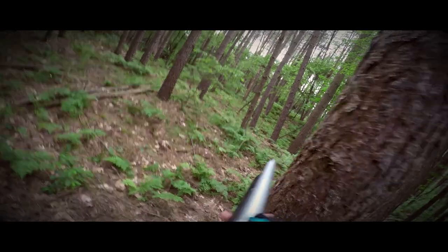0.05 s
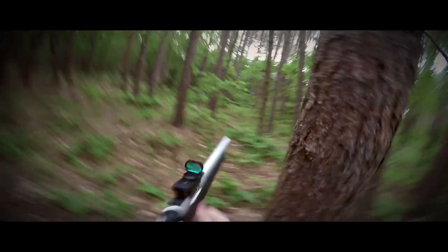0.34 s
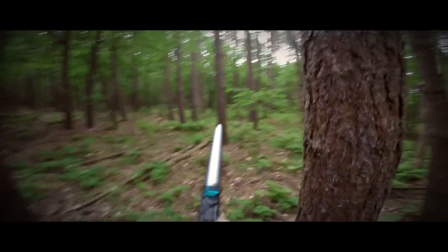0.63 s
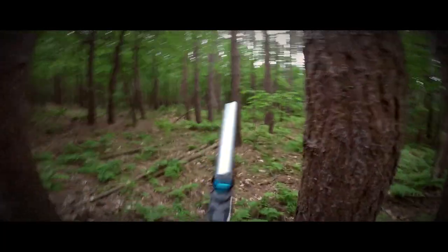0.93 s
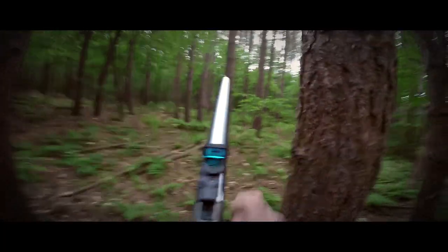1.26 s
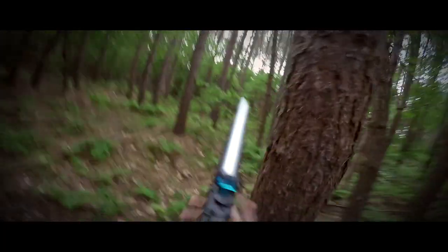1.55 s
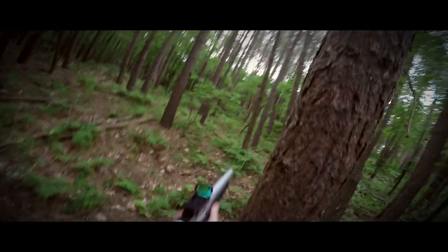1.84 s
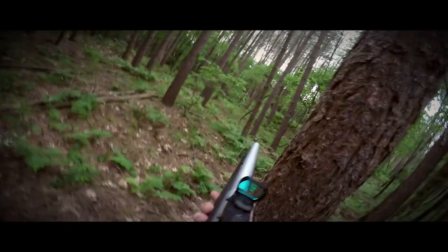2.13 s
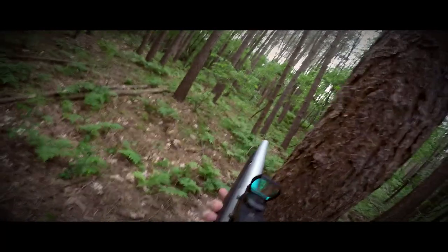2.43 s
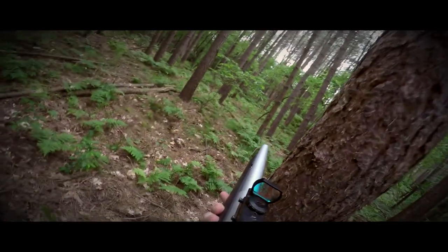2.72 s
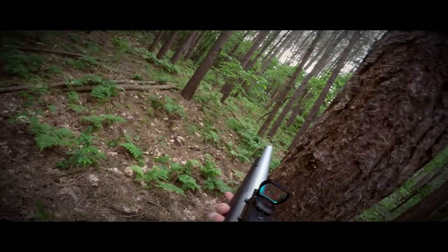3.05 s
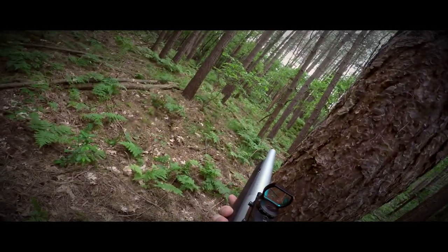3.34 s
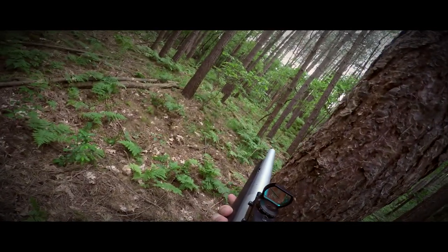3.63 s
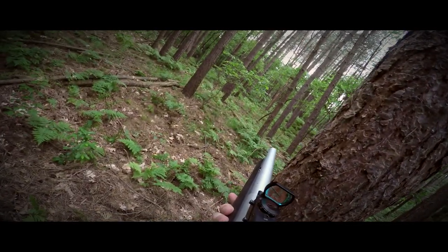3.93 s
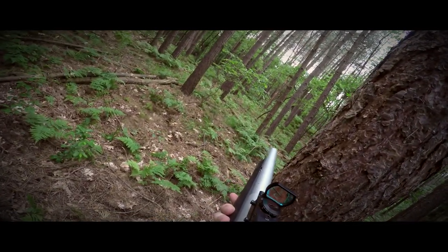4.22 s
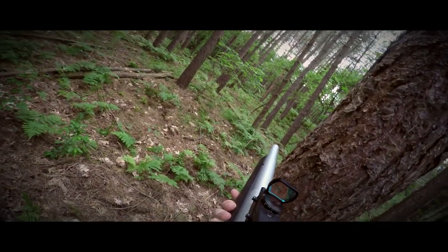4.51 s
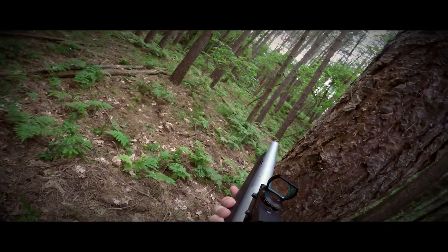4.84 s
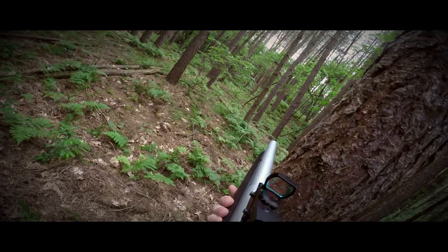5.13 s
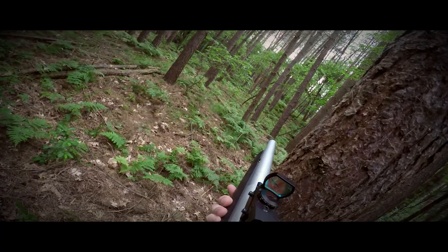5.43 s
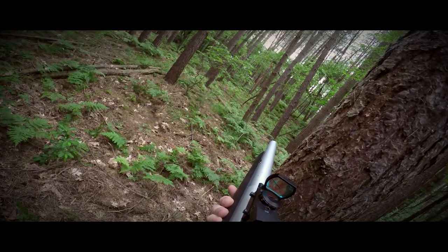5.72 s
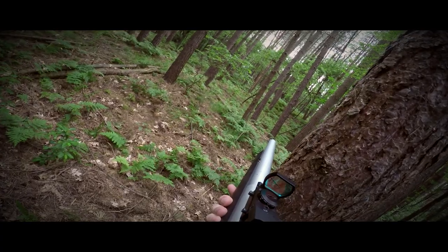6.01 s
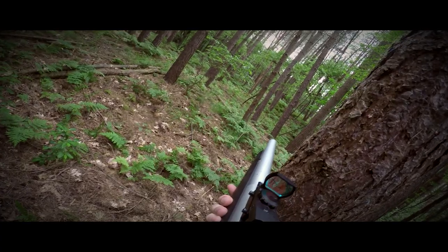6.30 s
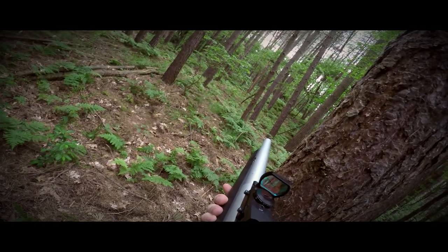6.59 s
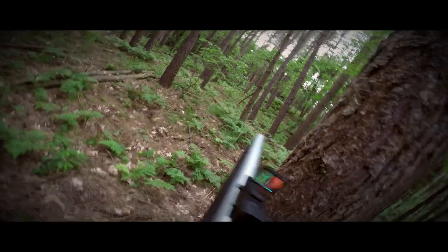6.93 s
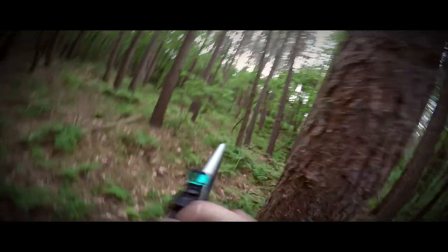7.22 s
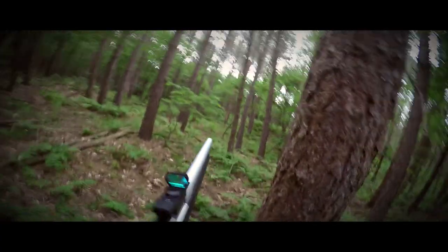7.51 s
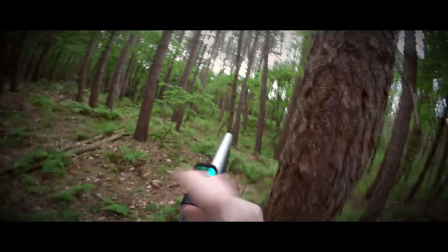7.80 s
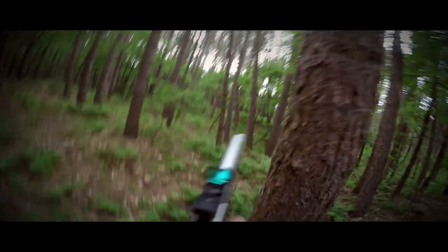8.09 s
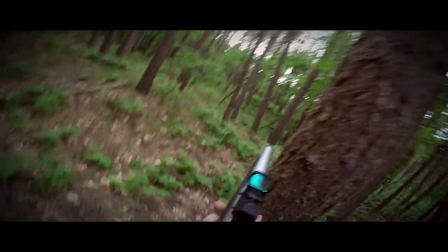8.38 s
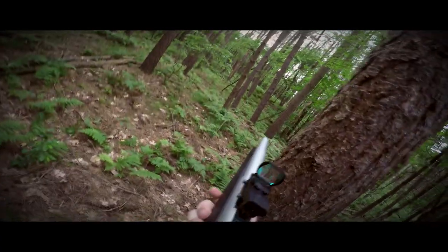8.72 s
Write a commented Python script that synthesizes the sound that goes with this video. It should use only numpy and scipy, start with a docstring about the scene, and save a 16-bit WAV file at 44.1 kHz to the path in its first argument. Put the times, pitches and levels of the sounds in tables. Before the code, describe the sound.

Hard clicks and clacks of an airsoft rifle being cocked sound at arm's length from a microphone on the shooter's head, mixed with three short, rapid bursts from a distant electric airsoft gun. For about four seconds there is little but dull forest air and a very faint bird. One shot snaps out with a thump and a short echo, followed by light taps, rustling clothes and another run of bolt clacks.

```python
"""A spring airsoft rifle in a forest, at arm's length from a microphone on the shooter's head.
The bolt is worked in hard clacks that ring stock and steel; after a long wait the piston thumps out
one shot, and the bolt is worked again. Some way off an electric airsoft gun ticks through three bursts;
both guns echo off the trunks. Cloth rustles close by, a far bird whistles, and air hums in the trees
and buffets the microphone, whose gain ducks after the shot."""
import sys
import numpy as np
from scipy import signal
from scipy.io import wavfile
from scipy.ndimage import uniform_filter1d, minimum_filter1d

SR = 44100
rng = np.random.default_rng(int(sys.argv[2]) if len(sys.argv) > 2 else 0)


def transcribe(u):
    """Save the signal u as a 16-bit wav file named by the first command-line argument.

    u: samples, shape (n,) or (channels, n), limited to [-1, 1]; the rate is SR.
    q: integer samples, one column per channel.
    """
    v = np.clip(np.atleast_2d(u).T, -1, 1)
    q = np.round(v * 32767).astype(np.int16)
    wavfile.write(sys.argv[1], SR, q)


N = 394694
TIME = np.arange(N) / SR
AGE = TIME[:4096]   # seconds since a blow
APPROACH = 256   # samples in which two faces graze before they meet
SHOT_S = 6.306


# Bands of the rifle's stock, receiver, cylinder and edges: boundary_hz
PART_BOUNDS = [0, 1000, 2700, 6000, 20000]
# Blows in the rifle, at arm's length: the bolt; sear, piston and rebound at the shot; the bolt again.
# start_s, level_db, pitch_hz, ring_db, stock_db, edge_db, chatter_s (ring, stock, edge relative to level)
RIFLE_BLOWS = [(0.6485, -30, 3920, 3.5, -26, -6.5, 0.0023), (0.6513, -21, 2170, -11, 0.5, -9.5, 0.0038),
               (0.842, -15.5, 3560, -4.5, -4, -18, 0.0025), (0.9041, -11, 1540, -15, -12.5, -13, 0.00088),
               (0.9129, -14, 1330, -2, -2.5, -7, 0.0016), (1.036, -14.5, 2540, -5.5, -10.5, -10, 0.0018),
               (1.051, -21, 3860, -7, -9, -15, 0.0028), (1.1976, -6.5, 3060, -16.5, -11, -14.5, 0.007),
               (1.2101, -9, 3600, -14, -6, -11, 0.0025), (1.377, -7, 4680, 0, -2.5, -8, 0.0021),
               (6.295, -21.5, 3340, -17.5, 1.5, -4, .002), (6.3037, -4.5, 5300, -16, -12, -10, 0.0043),
               (6.322, -13, 3840, -3.5, -7, -7.5, .0012), (7.2394, -21, 3910, -4, -3.5, -5.5, .002),
               (7.4303, -17, 1820, -16, -4, -28, 0.0021), (7.4635, -31, 1850, -5, -1.5, -28, 0.0036),
               (7.4903, -26.5, 3130, -20, -13, -15, 0.0024), (7.508, -22, 4780, -8, -4, -4.5, 0.0035),
               (7.6635, -19, 1326, 2.5, -11.5, -8, 0.0037), (7.673, -28, 4260, -8, -11, -11, 0.0017),
               (7.7972, -10.5, 2010, -1.5, -6, -17, .0008), (7.8024, -6.5, 3410, -5.5, -3.5, -5, 0.0021),
               (8.0429, -7, 3214, -1.5, -3.5, -13, 0.0019)]

def rifle_clacks(bounce_s=0.0033, bounce_db=-3.5, dulling_db=4.5, steel_db_per_octave=4, even_hz=2160):
    """Each blow and its duller bounce ring the rifle's four parts; where it lands, one pitch rings on."""
    out = np.zeros(N)
    spread = np.sqrt(0.005 * SR / len(AGE))   # a blow's level is its energy spread over 5 ms
    for start_s, level_db, pitch_hz, ring_db, stock_db, edge_db, chatter_s in RIFLE_BLOWS:
        hit, bounce = (impact(chatter=0.29, chatter_s=chatter_s, rattle_db=-18.5, rattle_s=0.011,
                              graze_db=-21, graze_s=0.0025) for _ in range(2))
        bounce = np.pad(bounce, (round(bounce_s * SR), 0))[:len(hit)]
        # the higher the pitch, the more steel cylinder and the less receiver
        steel = from_db(steel_db_per_octave * np.log2(pitch_hz / even_hz))
        receiver = 0.75 / np.hypot(1, steel)
        cylinder = 0.96 * steel / np.hypot(1, steel)
        for part, gain in enumerate([from_db(stock_db), receiver, cylinder, from_db(edge_db)]):
            force = hit + from_db(bounce_db - dulling_db * part) * bounce
            ring = rifle_ring(force, PART_BOUNDS[part], PART_BOUNDS[part + 1])
            add(out, start_s - APPROACH / SR, from_db(level_db) * gain * spread * rms_one(ring))
        add(out, start_s, from_db(level_db + ring_db) * spread * rms_one(swing(pitch_hz, t60_s=0.016)))
    return butterworth(out + 1e-18, 2, 430, "high")   # the slim stock radiates little bass


# The rifle's resonances, heard close: pitch_hz, width_hz, level_db
RIFLE_MODES = [(488, 190, -5.5), (757, 95, -1.5), (890, 540, -2.5), (1260, 120, 0), (1584, 110, -4),
               (2010, 230, -1), (2260, 460, 0.5), (3159, 200, 0.5), (3610, 150, -3), (3990, 400, -1.5),
               (4627, 410, -1), (5420, 260, -4.5), (5870, 570, -5.5), (6300, 1000, 0.5), (6900, 380, -2.5),
               (8370, 1800, -0.5), (11900, 1900, -6), (14100, 1700, -9)]

def rifle_ring(force, low_hz, high_hz, detune=0.01):
    """The modes within one band; they shift a little with the bolt's position and the point of contact."""
    shifts = np.exp(detune * rng.standard_normal(len(RIFLE_MODES)))
    return sum((-1) ** k * from_db(level_db) * resonate(force, pitch_hz * shifts[k], width_hz)
               for k, (pitch_hz, width_hz, level_db) in enumerate(RIFLE_MODES)
               if low_hz < pitch_hz <= high_hz)


# Jolts of the whole rifle, just below the microphone: start_s, pitch_hz, level_db, t60_s
RIFLE_JOLTS = [(1.198, 110, -16.5, 0.015), (1.208, 136.3, -16.5, 0.029), (6.294, 68.6, -9, 0.097),
               (6.308, 94, 0, 0.023), (6.316, 260, -10, 0.025), (6.3205, 495, -9.5, 0.032),
               (7.433, 427, -23.5, 0.04), (7.8, 129, -10.5, 0.024), (7.8046, 324, -18.5, 0.032)]

def rifle_thumps():
    """The piston and the bolt hit their end stops and set the whole rifle swinging."""
    out = np.zeros(N)
    for start_s, pitch_hz, level_db, t60_s in RIFLE_JOLTS:
        add(out, start_s, from_db(level_db) * swing(pitch_hz, t60_s))
    return out


def spring_buzz(level_db=-17, t60_s=0.05):
    """The released spring's coils rattle briefly against the cylinder."""
    out = np.zeros(N)
    grains = rng.standard_normal(SR) * rng.exponential(1, SR)
    rattle = rms_one(rifle_ring(grains, low_hz=2000, high_hz=6000))
    add(out, SHOT_S, from_db(level_db - 60 * TIME[:SR] / t60_s) * rattle)
    return out


def muzzle_puff(drive_db=9.5, decay_s=0.0091, band_hz=(1500, 6000), notch_hz=8550):
    """Air bursts out behind the pellet; the barrel hollows one band out of its hiss."""
    out = np.zeros(N)
    puff = from_db(drive_db) * np.exp(-AGE / decay_s) * rng.standard_normal(len(AGE))
    puff = butterworth(puff, 1, band_hz, "band")
    puff = butterworth(puff, 4, 12000)
    add(out, SHOT_S, signal.lfilter(*signal.iirnotch(notch_hz, Q=2.9, fs=SR), puff))
    return out


# The bolt travelling in its tube, close by: start_s, length_s, level_db
BOLT_STROKES = [(0.818, 0.076, -32.5), (1.066, 0.22, -51), (7.408, 0.08, -35)]

def bolt_slides(body_hz=1200, steel_hz=3800):
    """The bolt scrapes along in gritty slips; the hand on it damps the ring to two broad humps."""
    out = np.zeros(N)
    for start_s, length_s, level_db in BOLT_STROKES:
        force = friction(length_s, grain_db=5.5)
        rub = 1.7 * resonate(force, body_hz, width_hz=1400) + resonate(force, steel_hz, width_hz=1900)
        add(out, start_s, from_db(level_db) * rms_one(butterworth(rub, 1, 8500)))
    return out


# Hands and kit near the microphone, and the pellet landing after the shot: start_s, level_db, pitch_hz
LIGHT_TAPS = [(0.031, -17.5, 4070), (0.158, -26, 5400), (1.509, -31, 1910), (1.5662, -28, 2850),
              (1.93, -20, 1320), (2.0806, -29, 1250), (6.445, -23.5, 1850), (6.8311, -18, 1380),
              (7.041, -32, 2200), (7.088, -27.5, 2760), (7.133, -28.5, 1690), (7.1686, -27, 3800),
              (7.405, -29, 6900), (7.973, -26, 1980), (8.1449, -23.5, 2430)]

def light_taps(width_share=0.7, click_db=-10):
    """Small, soft, well-damped knocks, each with a pitch of its own and a faint click."""
    def hump(force, hz, width_hz):
        return rms_one(resonate(resonate(force, hz, width_hz), hz, width_hz))
    out = np.zeros(N)
    for start_s, level_db, pitch_hz in LIGHT_TAPS:
        force = impact(chatter=0.56, chatter_s=0.0038, rattle_db=-14, rattle_s=0.0082,
                       graze_db=-36.5, graze_s=0.00092)
        tap = hump(force, pitch_hz, width_share * pitch_hz)
        tap += from_db(click_db) * hump(force, hz=3600, width_hz=4500)
        add(out, start_s - APPROACH / SR, from_db(level_db) * tap / np.abs(tap).max())
    return butterworth(out + 1e-18, 2, 8000)


# Kit and rifle parts settling on the shooter: start_s, length_s, pitch_hz, level_db
KIT_SQUEAKS = [(0.165, 0.088, 3380, -49), (7.815, 0.06, 1650, -42)]

def kit_squeaks(width_share=0.28):
    """Parts that rub as they settle sound one rough pitch."""
    out = np.zeros(N)
    for start_s, length_s, pitch_hz, level_db in KIT_SQUEAKS:
        add(out, start_s, from_db(level_db) * wavering_tone(length_s, pitch_hz, width_share * pitch_hz))
    return out


# Another player's gun, some way off among the trees: start_s, shots, first_cycle_s, gain_db
DISTANT_BURSTS = [(0.301, 5, .086, 3.5), (0.968, 7, .0778, -1), (1.726, 4, .0765, 1.5)]

def electric_gun(cycle_s=0.0738, tick_db=-22.5, pop_db=-28, whirr_db=-52.5, run_on_s=0.18):
    """A motor fires evenly after a slower first cycle: a tick and a hollow pop a shot, over gear whirr."""
    out = np.zeros(N)
    for start_s, shots, first_cycle_s, gain_db in DISTANT_BURSTS:
        shot_times = [start_s, *(start_s + first_cycle_s + cycle_s * np.arange(shots - 1))]
        for shot_s in shot_times:
            tick = plastic_ring(impact(chatter=0.4, chatter_s=0.0017, rattle_db=-21, rattle_s=0.02,
                                       graze_db=-12.5, graze_s=0.002))
            tick /= np.abs(tick).max()
            add(out, shot_s - APPROACH / SR + 0.002, from_db(gain_db + tick_db) * tick)
            add(out, shot_s, from_db(gain_db + pop_db) * swing(pitch_hz=650, t60_s=0.02))
        whirr = plastic_ring(friction(shot_times[-1] - start_s + run_on_s, grain_db=3.5))
        add(out, start_s, from_db(gain_db + whirr_db) * rms_one(whirr))
    return out


# The electric gun's resonances, heard from a distance: pitch_hz, width_hz, level_db
PLASTIC_MODES = [(590, 99, 19.5), (1510, 300, -7), (3255, 230, -5), (3920, 390, 10.5), (4682, 400, -2),
                 (5773, 170, -5), (8000, 300, -10.5), (11400, 560, -6)]

def plastic_ring(force):
    """A force rings the electric gun's hollow plastic body."""
    ring = sum(from_db(level_db) * resonate(force, pitch_hz, width_hz)
               for pitch_hz, width_hz, level_db in PLASTIC_MODES)
    return butterworth(ring, 2, 12000)


# Colour of what the forest sends back to the microphone: frequency_hz, gain_db
ECHO_COLOUR = [(200, -3), (2300, 2), (3500, -1.5), (10000, 1.5), (15000, -7.5)]

def forest_echo(x, near_db=-26, near_t60_s=0.21, far_db=-29.5, far_t60_s=1.0, air_hz=11000, frame=256):
    """Ground and near trunks scatter a quick wash, far trunks a faint long one that loses its treble."""
    def linger(power, level_db, t60_s):
        keep = from_db(-60 * frame / SR / t60_s)
        return from_db(level_db) ** 2 * signal.lfilter([1 - keep], [1, -keep], power)
    bands_hz, _, spectrum = signal.stft(np.pad(x, (frame, 0))[:N], SR, nperseg=frame)
    powers = uniform_filter1d(np.abs(spectrum) ** 2, size=3, axis=0).clip(0) + 1e-20
    tails = np.array([linger(power, near_db, near_t60_s)
                      + linger(power, far_db, far_t60_s / (1 + (hz / air_hz) ** 2))
                      for hz, power in zip(bands_hz, powers)])
    # countless paths blur each sound into noise of its own colour
    wash = signal.stft(rng.standard_normal(N), SR, nperseg=frame)[2]
    colour = from_db(np.interp(bands_hz, *np.transpose(ECHO_COLOUR)))[:, None]
    return signal.istft(colour * np.sqrt(tails) * wash / wash.std(), nperseg=frame)[1][:N]


# How briskly the shooter moves under the microphone, as the level of cloth: time_s, level_db
SHOOTER_MOVEMENT = [(0, -40), (.6, -50.5), (1.25, -46.5), (1.6, -58), (1.95, -47), (2.2, -53.5),
                    (2.52, -59.5), (2.66, -67.5), (4.4, -67), (4.65, -60.5), (5.1, -69), (6.3, -72.5),
                    (6.7, -62.5), (7.3, -52), (7.9, -51), (8.2, -55), (8.7, -57.5), (8.95, -67)]
# Clothing, heard close: frequency_hz, density_db
CLOTH_SPECTRUM = [(900, 0), (2000, 2.5), (3400, 1.5), (5000, -8.5), (7000, -18), (15000, -25)]

def cloth_rustle(rustle_db=-1, crinkle_db=-11.5, snaps_per_s=90, snap_s=0.002, snap_hz=4200):
    """Cloth rubs and its folds snap at random, both louder as the shooter moves."""
    rustle = wavering_noise(CLOTH_SPECTRUM, depth_db=1.3, rate_hz=40)
    snaps = 1.0 * (rng.random(N) < snaps_per_s / SR)
    force = signal.lfilter([1], [1, -np.exp(-1 / (snap_s * SR))], snaps + 1e-18) * rng.standard_normal(N)
    crinkles = rms_one(resonate(resonate(force, snap_hz, width_hz=3500), snap_hz, width_hz=7000))
    return gain_curve(SHOOTER_MOVEMENT) * (from_db(rustle_db) * rustle + from_db(crinkle_db) * crinkles)


# Air stirred at the microphone as the head turns: time_s, level_db
HEAD_AIRFLOW = [(0, -42.5), (1.25, -33), (1.65, -40.5), (2.1, -37.5), (2.8, -43.5), (6.7, -43),
                (7.8, -31.5), (8.1, -33.5), (8.95, -40)]
# Its rumble, right on the microphone: frequency_hz, density_db
BUFFET_SPECTRUM = [(11, 2), (25, -15.5), (45, -19.5), (90, -30), (200, -43.5)]

def microphone_buffet():
    """Moving air buffets the microphone with a low, uneven rumble."""
    return gain_curve(HEAD_AIRFLOW) * wavering_noise(BUFFET_SPECTRUM, depth_db=0.45, rate_hz=22)


# The forest all around, a dull hum and a faint hiss: frequency_hz, density_db
HUM_SPECTRUM = [(40, 2), (80, 5.5), (150, -3), (280, 1.5), (600, 0.5), (920, 2), (1300, -2), (1800, -14),
                (2500, -29.5), (4000, -32)]
HISS_SPECTRUM = [(2000, 0.5), (15000, -6)]

def forest_air(hum_db=-49.5, hiss_db=-71, swish_db=2):
    """Air hums steadily in the trees; the shooter's movement adds a dull swish of the same colour."""
    hum_gain = np.hypot(from_db(hum_db), from_db(swish_db) * gain_curve(SHOOTER_MOVEMENT))
    hum = hum_gain * wavering_noise(HUM_SPECTRUM, depth_db=0.2, rate_hz=5)
    hiss = from_db(hiss_db) * wavering_noise(HISS_SPECTRUM, depth_db=0.5, rate_hz=1)
    return hum + hiss


# A bird far off in the forest: start_s, length_s, pitch_hz
BIRD_WHISTLES = [(3.01, 0.2, 4290), (3.41, 0.11, 4310), (3.63, 0.29, 4320)]

def far_bird(level_db=-78, width_hz=110):
    """Distance blurs each whistle into a faint, wavering line."""
    out = np.zeros(N)
    for start_s, length_s, pitch_hz in BIRD_WHISTLES:
        add(out, start_s, from_db(level_db) * wavering_tone(length_s, pitch_hz, width_hz))
    return out


def impact(chatter, chatter_s, rattle_db, rattle_s, graze_db, graze_s):
    """Force of one blow: a brief graze, a click, chattering faces and a faint rattle of loose parts."""
    grains = rng.standard_normal(len(AGE)) * rng.exponential(1, len(AGE))
    envelope = np.exp(-(AGE / chatter_s) ** 2) + from_db(rattle_db) * np.exp(-AGE / rattle_s)
    force = chatter * grains * envelope
    force[0] += 1   # the click
    graze = np.diff(rng.standard_normal(APPROACH + 1)) * np.exp(-AGE[:APPROACH][::-1] / graze_s)
    return np.concatenate([from_db(graze_db) * graze, force[:-APPROACH]])


def friction(length_s, grain_db, slip_samples=64):
    """Force of one rubbing stroke: noise that swells and fades, its strength jumping with every slip."""
    size = round(length_s * SR)
    push = np.sqrt(np.abs(np.sin(np.linspace(0, np.pi, size))))
    slips = np.repeat(rng.standard_normal(size), slip_samples)[:size]
    return push * from_db(grain_db * slips) * rng.standard_normal(size)


def swing(pitch_hz, t60_s):
    """A damped sine, the free swing of one mode."""
    return -from_db(-60 * AGE / t60_s) * np.sin(2 * np.pi * pitch_hz * AGE)


def resonate(x, hz, width_hz):
    """Two-pole resonance that passes the same noise power at any width."""
    radius = np.exp(-np.pi * width_hz / SR)
    angle = 2 * np.pi * hz / SR
    feedback = [1, -2 * radius * np.cos(angle), radius ** 2]
    return signal.lfilter(np.sqrt(1 - radius ** 2) * np.array([1, 0, -1]), feedback, x + 1e-18)


def wavering_tone(length_s, pitch_hz, width_hz):
    """Grainy noise narrowed to one unsteady pitch; rms 1."""
    force = friction(length_s, grain_db=4)
    return rms_one(resonate(resonate(force, pitch_hz, width_hz), pitch_hz, width_hz))


def wavering_noise(spectrum, depth_db, rate_hz):
    """Noise whose half-octave bands swell and fade on their own; rms 1."""
    hz, density_db = np.transpose(spectrum)
    edges_hz = 11 * 2 ** (np.arange(22) / 2)
    white = rng.standard_normal((2, N + SR // 2))
    out = np.zeros(N)
    for k, (low, high) in enumerate(zip(edges_hz, edges_hz[1:])):
        if high > hz[0] and low < hz[-1]:
            band = butterworth(white[k % 2], 2, [low, high], "band")[-N:]
            band_db = np.interp(np.log(np.sqrt(low * high)), np.log(hz), density_db)
            drift = np.interp(TIME * rate_hz, np.arange(512), rng.standard_normal(512))
            out += band * from_db(band_db + depth_db * drift)
    return rms_one(out)


def butterworth(x, order, hz, kind="low"):
    """Low-, high- or band-pass filter."""
    return signal.sosfilt(signal.butter(order, hz, kind, fs=SR, output="sos"), x)


def from_db(db):
    """Decibels to gain."""
    return 10 ** (np.asarray(db) / 20)


def rms_one(x):
    """Scale to rms 1."""
    return x / np.sqrt(np.mean(x ** 2) + 1e-20)


def gain_curve(rows):
    """Rows of time_s, level_db to one gain per sample."""
    return from_db(np.interp(TIME, *np.transpose(rows)))


def add(out, start_s, sound):
    """Mix a sound in at a time."""
    i = max(0, round(start_s * SR))
    out[i:i + len(sound)] += sound[:N - i]


def scene():
    """One microphone among the trees: the rifle close, the electric gun further off, cloth and air."""
    rifle = rifle_clacks() + bolt_slides() + light_taps() + kit_squeaks() + spring_buzz()
    distant = electric_gun()
    puff = muzzle_puff()
    background = forest_air() + cloth_rustle() + microphone_buffet()
    # the muzzle points away, so its puff is heard mostly as echo; the distant gun has more echo too
    direct = rifle + rifle_thumps() + distant + from_db(-25) * puff
    echo = forest_echo(rifle + from_db(14.5) * distant + puff)
    return (direct + echo + background + far_bird())[None]


def gain_control(x, bass_hz=860, threshold_db=-23, window_s=0.043, attack_s=0.097, hold_s=0.31,
                 recover_db_per_s=27, start_duck_db=16):
    """Heavy bass turns the gain down; it holds, then climbs back. It is still recovering at the start."""
    window, hold = round(window_s * SR), round(hold_s * SR)
    bass = butterworth(x, 2, bass_hz)
    power = np.abs(uniform_filter1d(bass ** 2, window, origin=(window - 1) // 2))
    over_db = np.maximum(10 * np.log10(power + 1e-12) - threshold_db, 0)
    held_db = -minimum_filter1d(-over_db, hold, origin=(hold - 1) // 2, mode="nearest")
    climb_db = recover_db_per_s * TIME
    target_db = np.maximum.accumulate(held_db + climb_db) - climb_db
    keep = np.exp(-1 / (attack_s * SR))
    duck_db = signal.lfilter([1 - keep], [1, -keep], target_db)
    return from_db(-np.maximum(duck_db, start_duck_db - climb_db))


def record(dry, overload=1.15, cutoff_hz=15700):
    """The gain ducks after the shot, the hardest blows overload the microphone, and the top is cut."""
    clipped = np.clip(dry * gain_control(dry[0]), -overload, overload)
    return signal.sosfilt(signal.ellip(10, 0.1, 80, cutoff_hz, fs=SR, output="sos"), clipped)


dry = scene()
out = record(dry)
transcribe(out)
```